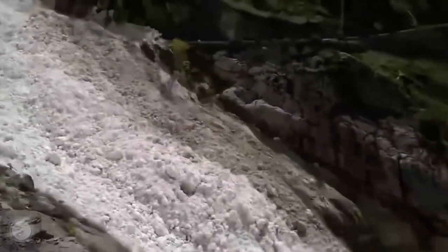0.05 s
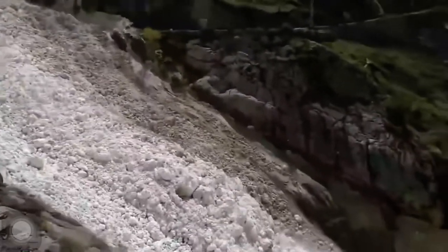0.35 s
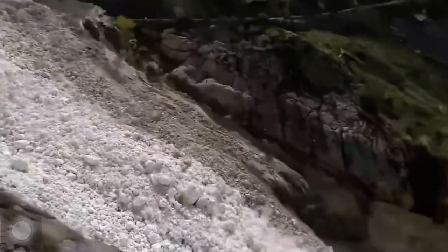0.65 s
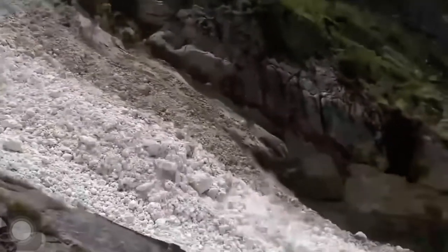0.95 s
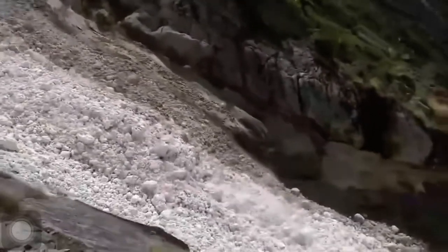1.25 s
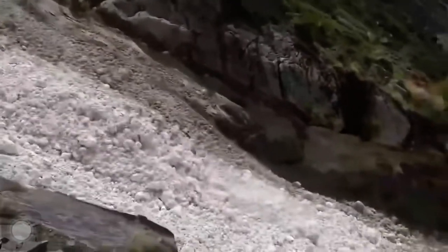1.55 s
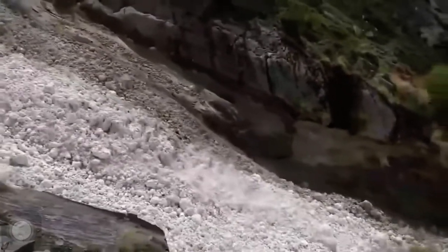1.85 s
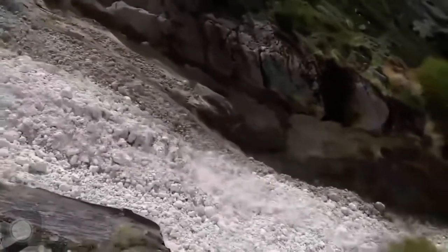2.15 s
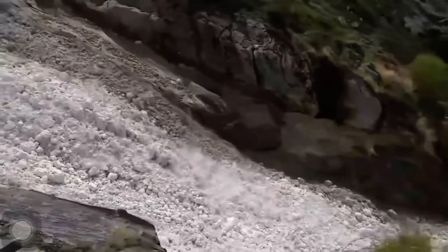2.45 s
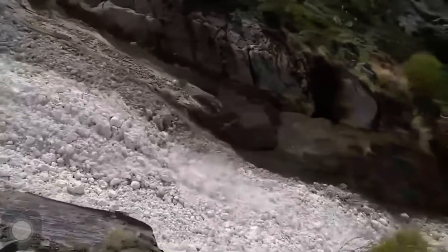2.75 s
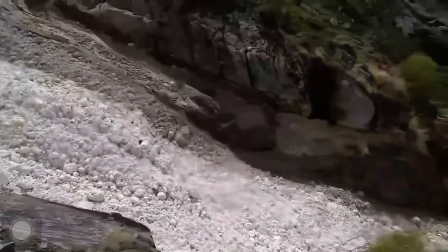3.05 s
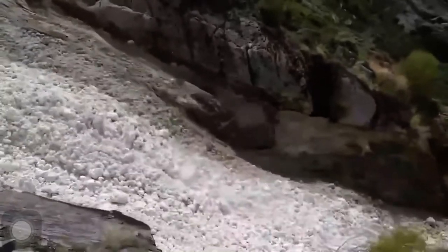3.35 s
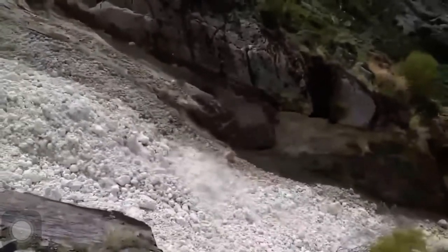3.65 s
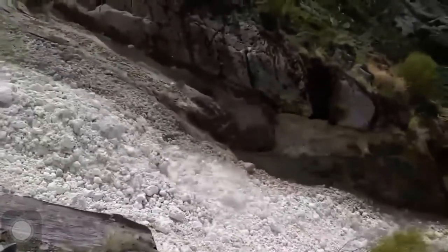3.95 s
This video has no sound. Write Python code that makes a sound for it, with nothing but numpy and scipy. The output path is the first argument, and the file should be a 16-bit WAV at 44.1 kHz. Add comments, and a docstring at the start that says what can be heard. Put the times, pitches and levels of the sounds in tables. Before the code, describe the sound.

Snow and ice lumps slide down a rocky gully in an even, gravelly rush for the whole four seconds. Wind rumbles and flutters on the microphone throughout, in uneven gusts. Short, low thumps with a tearing edge hit it irregularly and sometimes briefly overload it. They come thickly until about 2.3 seconds, then more sparsely, around 2.7 seconds and from 3.2 to 3.6 seconds.

```python
"""In a rocky gully, a river of snow and ice lumps slides downhill. Countless small collisions merge
into an even rush over a low rumble of wind. Gusts buffet the microphone, brighter as they grow
stronger, and the hardest eddies (swirls of air) thump against it and briefly overload it.
A very faint, high hiss swells and fades."""
import sys
import numpy as np
from scipy import signal
from scipy.fft import rfft, irfft
from scipy.io import wavfile
from scipy.ndimage import uniform_filter1d

SR = 44100
rng = np.random.default_rng(int(sys.argv[2]) if len(sys.argv) > 2 else 0)


def pcm_store(signal):
    """Save signal as 16-bit PCM."""
    levels = np.round(np.clip(np.atleast_2d(signal), -1, 1) * 32767)
    wavfile.write(sys.argv[1], SR, levels.astype(np.int16).T)


N = 176400  # 4 seconds


def sliding_ice():
    """Ice grains collide so often that they blur into a rush, with gravelly mids and fine spray on top."""
    # tone of the rush (frequency [Hz], relative level [dB])
    rush_tone = [(300, -10), (600, 6.5), (1000, 1), (1600, 0), (2100, -4), (2700, -7.5), (3300, -7.5),
                 (4100, -11), (5000, -17), (5700, -23.5), (6800, -31), (7400, -38.5), (8200, -54),
                 (10000, -63), (15000, -65.5)]
    # loudness of the flow (time [s], level [dB])
    flow_level = [(0, -31.5), (.2, -33.5), (.6, -34.5), (1.0, -33), (1.6, -33), (2.2, -33.5), (2.8, -33),
                  (3.4, -32.5), (3.8, -32), (4, -32)]
    # boost or cut of the gravelly middle pitches (time [s], level [dB])
    gravel_level = [(0, 1.5), (1.0, -3.6), (2.0, -1), (3.0, 0.2), (4, 2.5)]
    # boost or cut of the finest spray (time [s], level [dB])
    spray_level = [(0, 1.5), (.5, 2), (1.0, -2.5), (2.0, -1), (3.0, -1.3), (4, -1.3)]
    grains_per_s, gravel_hz, gravel_octaves, spray_hz = 30000, 2200, 0.47, 3500
    hits = (rng.random(N) < grains_per_s / SR) * rng.standard_normal(N)
    rush = 0
    for hz, band in bands(colour(hits, rush_tone), lowest_hz=580, count=5):
        flicker_db = 0.4 * wander(per_s=20)
        gravel_db = bell(np.log2(hz / gravel_hz), gravel_octaves, gravel_octaves) * curve(gravel_level)
        spray_db = (hz > spray_hz) * curve(spray_level)
        rush = rush + band * gain(flicker_db + gravel_db + spray_db)
    return rush * gain(curve(flow_level))


def wind_gusts():
    """Churning air flutters on the microphone; in a gust, the treble grows faster than the bass."""
    # strength of the wind (time [s], level [dB])
    gust_level = [(0, -19.5), (.03, -20), (.06, -22.5), (.13, -22), (.17, -27.5), (.24, -27.5),
                  (.28, -22.5), (.34, -24), (.42, -19), (.44, -28.5), (.55, -27), (.62, -31), (.66, -22),
                  (.76, -24), (.79, -33), (.86, -25.5), (.89, -31.5), (.96, -20.5), (1.01, -30.5),
                  (1.07, -29.5), (1.13, -31), (1.18, -22.5), (1.29, -21.5), (1.37, -28.5), (1.41, -29),
                  (1.48, -30), (1.55, -23), (1.63, -23), (1.70, -29), (1.77, -31), (1.83, -26),
                  (1.92, -23.5), (1.97, -26.5), (2.03, -18), (2.08, -36), (2.18, -21), (2.26, -29.5),
                  (2.47, -28.5), (2.52, -37), (2.63, -31.5), (2.71, -24.5), (2.82, -37), (3.08, -33.5),
                  (3.12, -24.5), (3.2, -25.5), (3.25, -33), (3.32, -34.5), (3.37, -31.5), (3.48, -29.5),
                  (3.51, -21.5), (3.62, -27.5), (3.77, -41.5), (3.81, -22), (3.85, -31), (3.9, -29.5),
                  (4, -35.5)]
    # tone of an average gust (frequency [Hz], relative level [dB])
    wind_tone = [(25, -28.5), (36, -19), (50, -7), (70, 2), (115, 0.5), (170, -2.5), (250, -4), (350, -8.5),
                 (500, -17), (700, -27), (1000, -39.5), (2000, -68.5), (6000, -100)]
    average_gust_db, flutter_db, wind_db = -26, 2.5, -15.5
    growth_hz, growth_db_per_db = (116, 566), (0.53, 1.42)  # how strongly two pitches follow a gust
    gust_db = curve(gust_level) - average_gust_db + flutter_db * wander(per_s=70)
    buffeting = 0
    for hz, band in bands(noise(wind_tone), lowest_hz=54, count=6):
        growth = np.interp(np.log(hz), np.log(growth_hz), growth_db_per_db)
        steady_band = even_out(band) * np.std(band)
        buffeting = buffeting + steady_band * gain(growth * gust_db)
    return buffeting * gain(wind_db)


def eddies():
    """Each hard eddy thumps: a pressure peak between weaker swings, with a noisy, tearing edge."""
    # eddies hitting the microphone (time [s], peak [dB], pitch [Hz], length [cycles], tearing [dB])
    eddy_hits = [(0.035, 0, 123, 0.77, -15), (.108, 2, 117, 1.1, -11), (.133, -7.5, 307, 0.46, -16.5),
                 (.233, 3, 149, 0.99, -31), (0.281, -15, 236, 1.1, -19), (0.367, -3, 191, 1.17, -31),
                 (0.395, -3.5, 205, 0.8, -22), (0.685, -1.5, 147, 1.15, -28), (.757, -2.5, 140, 0.44, -14),
                 (.913, -20, 480, 1.6, -16), (.925, 2.5, 150, 0.42, -16.5), (0.936, -4, 126, 0.63, -29),
                 (0.952, -3, 165, 0.9, -10.5), (1.102, -2.5, 146, 0.65, -20), (1.197, -5, 127, 0.61, -19),
                 (1.268, -6.5, 133, 1.2, -17), (1.319, -5.5, 220, .55, -15.5), (1.413, 1, 129, 0.33, -28.5),
                 (1.419, -1, 170, 0.15, -16), (1.637, -5, 170, 0.71, -22), (1.715, 1.5, 133, 0.5, -24),
                 (1.806, -4.5, 269, 0.66, -26.5), (1.866, -1.5, 138, 0.79, -34), (1.903, -3, 107, .6, -21),
                 (1.992, 3.5, 185, 0.64, -26), (2.03, -1, 198, 1.05, -29), (2.135, -4.5, 110, 0.43, -32),
                 (2.192, -2.5, 112, 0.41, -20.5), (2.233, -15.5, 335, 1, -20), (2.34, -5, 108, 0.81, -22.5),
                 (2.669, -4, 149, 0.64, -24), (2.698, -6, 162, 0.48, -21), (2.744, -6.5, 135, 1.16, -29),
                 (3.196, -2.5, 117, 0.54, -27), (3.382, -3.5, 125, 0.46, -25.5),
                 (3.514, -6.5, 210, 0.79, -23), (3.574, -1, 157, 0.73, -21)]
    # tone of the tearing edge (frequency [Hz], relative level [dB])
    tear_tone = [(120, -15), (280, 5.5), (520, 6.5), (750, -2.5), (1100, -14.5), (1700, -21.5),
                 (3000, -48.5), (7000, -80)]
    t = np.arange(N) / SR
    tear = even_out(noise(tear_tone))
    thumps, presence = 0, 0  # presence goes from 0 (no eddy) to 1 (an eddy's peak)
    for peak_s, peak_db, hz, length, tear_db in eddy_hits:
        cycles = (t - peak_s) * hz
        swell = bell(cycles / length, rise=0.65, fall=0.92)
        thumps = thumps + gain(peak_db) * swell * np.cos(2 * np.pi * cycles)
        thumps = thumps + gain(tear_db) * bell(t - peak_s, rise=0.0042, fall=0.0048) * tear
        presence = np.maximum(presence, swell)
    return thumps, presence


def wind_rumble():
    """Wind on the microphone makes a low rumble in slow surges."""
    # tone of the rumble (frequency [Hz], relative level [dB])
    rumble_tone = [(25, -28.5), (38, -17.5), (55, -3.5), (80, 5.5), (120, 6), (180, 2.5), (300, -9),
                   (500, -26), (1000, -46), (5000, -93.5)]
    # loudness of the surges (time [s], level [dB])
    surge_level = [(0, -19), (.6, -20.5), (1.1, -24), (1.5, -19), (2.0, -19), (2.5, -21), (2.95, -25),
                   (3.25, -16), (3.32, -36), (3.45, -20), (4, -24)]
    return even_out(noise(rumble_tone)) * gain(curve(surge_level))


def faint_top_hiss():
    """A very faint, high hiss swells and fades."""
    # tone of the hiss (frequency [Hz], relative level [dB])
    hiss_tone = [(7000, -32), (9500, -13), (10800, -8.5), (12000, 2.5), (13500, -8), (15500, -9)]
    # loudness of the hiss (time [s], level [dB])
    hiss_level = [(0, -82.5), (.6, -81.5), (1.05, -86), (1.2, -95), (2.15, -86), (2.5, -78), (2.7, -81),
                  (2.85, -75.5), (3.35, -75.5), (3.6, -82), (3.75, -77), (4, -74)]
    return noise(hiss_tone) * gain(curve(hiss_level))


def gain(db):
    """Turn decibels into a number to multiply a sound by."""
    return 10 ** (np.asarray(db) / 20)


def unit(x):
    """Scale to an average (rms) level of 1."""
    return x / np.sqrt(np.mean(x ** 2))


def curve(rows):
    """Join (time [s], value) rows by straight lines."""
    return np.interp(np.arange(N) / SR, *np.array(rows).T)


def bell(x, rise, fall):
    """A bell shape that peaks at x = 0, with its own width on each side."""
    return np.exp(-.5 * (x / np.where(x < 0, rise, fall)) ** 2)


def log_frequencies():
    """The logarithm of each frequency in a spectrum."""
    return np.log(np.maximum(np.arange(N // 2 + 1) * SR / N, 1))


def colour(x, tone):
    """Shape a sound by (frequency [Hz], relative level [dB]) rows, then scale it to level 1."""
    hz, db = np.array(tone).T
    gains = gain(np.interp(log_frequencies(), np.log(hz), db))
    return unit(irfft(rfft(x) * gains, N))


def noise(tone):
    """Random noise with the given tone, at level 1."""
    return colour(rng.standard_normal(N), tone)


def bands(x, lowest_hz, count):
    """Split a sound into overlapping bands an octave apart; gives (frequency [Hz], band) pairs."""
    centres, spectrum = lowest_hz * 2. ** np.arange(count), rfft(x)
    for hz, pick in zip(centres, np.eye(count)):
        share = np.interp(log_frequencies(), np.log(centres), pick)
        yield hz, irfft(spectrum * share, N)


def wander(per_s):
    """A smooth random wobble of size about 1 that changes about per_s times a second."""
    width = int(SR / per_s)
    smoothed = uniform_filter1d(rng.standard_normal(N), width, mode="wrap")
    return unit(uniform_filter1d(smoothed, width, mode="wrap"))


def even_out(x, window_s=0.036, amount=0.37):
    """Soften chance bumps in loudness so that a noise rolls on, at level 1."""
    power = uniform_filter1d(np.abs(signal.hilbert(x)) ** 2, int(window_s * SR), mode="wrap")
    return unit(x / power ** (amount / 2))


def scene():
    """The rush of the ice over a low roar of wind that dips while each hard eddy passes."""
    roar = wind_gusts() + wind_rumble()
    thumps, presence = eddies()
    dip_db = -3 * presence
    return (sliding_ice() + roar * gain(dip_db) + thumps + faint_top_hiss())[None]


def record(dry):
    """The microphone drops the deepest bass, flattens the largest swings and cuts the highest treble."""
    low_cut_hz, high_cut_hz, fade_s = 38.8, 15800, 0.004
    bass_cut = signal.butter(2, low_cut_hz, "high", fs=SR, output="sos")
    treble_cut = signal.ellip(8, .2, 70, high_cut_hz, fs=SR, output="sos")
    overloaded = np.clip(signal.sosfiltfilt(bass_cut, dry), -1, 1)
    t = np.arange(N) / SR
    soft_ends = np.clip(np.minimum(t, t[-1] - t) / fade_s, 0, 1)
    return signal.sosfilt(treble_cut, overloaded * soft_ends)


dry = scene()
out = record(dry)
pcm_store(out)
```